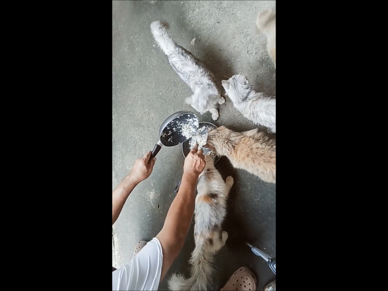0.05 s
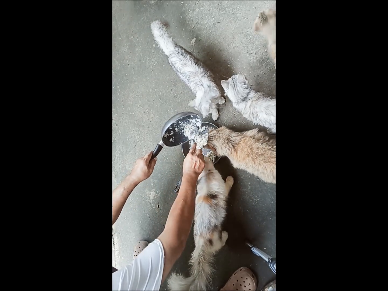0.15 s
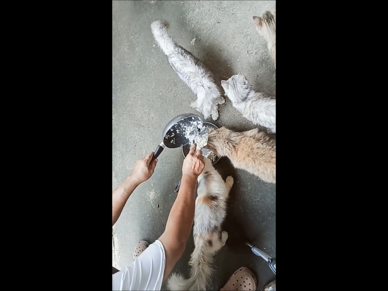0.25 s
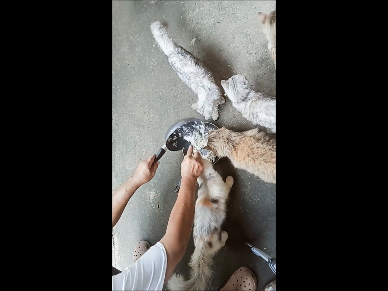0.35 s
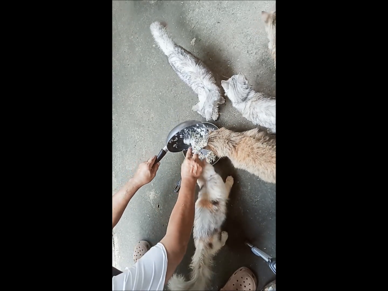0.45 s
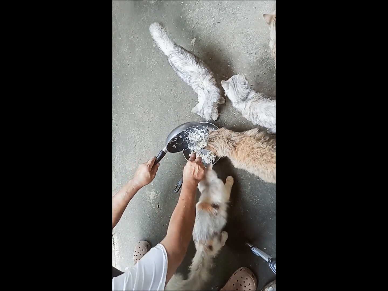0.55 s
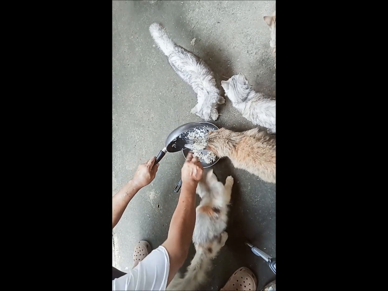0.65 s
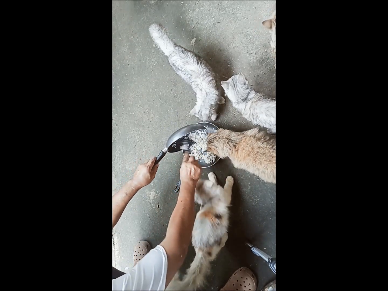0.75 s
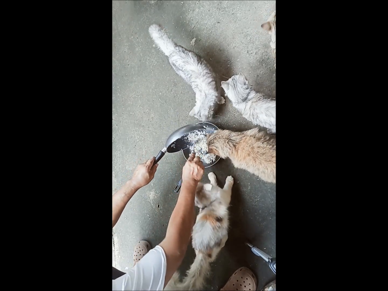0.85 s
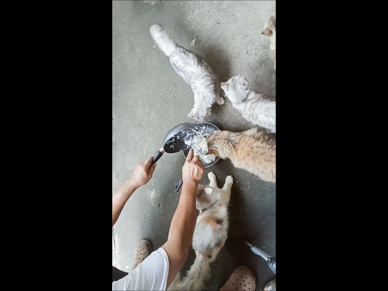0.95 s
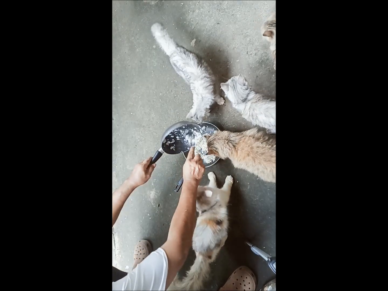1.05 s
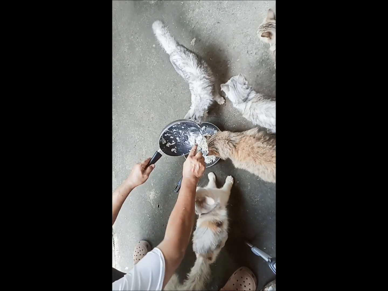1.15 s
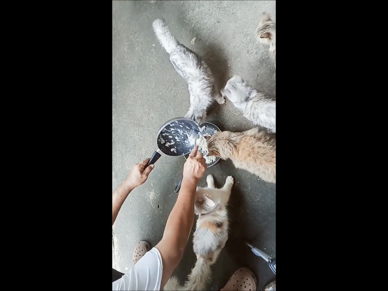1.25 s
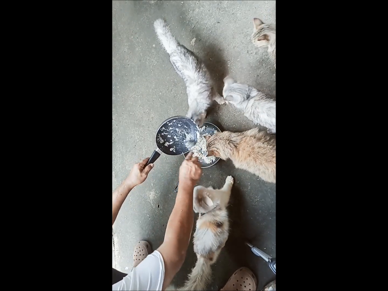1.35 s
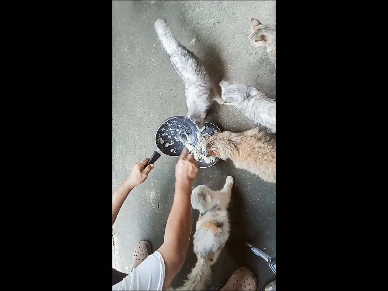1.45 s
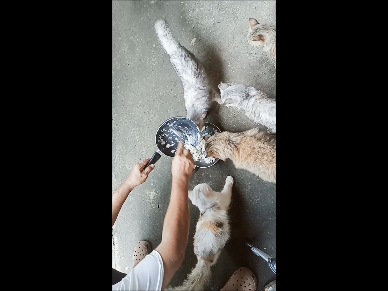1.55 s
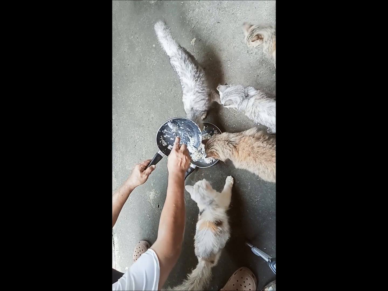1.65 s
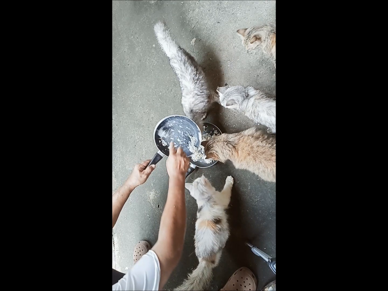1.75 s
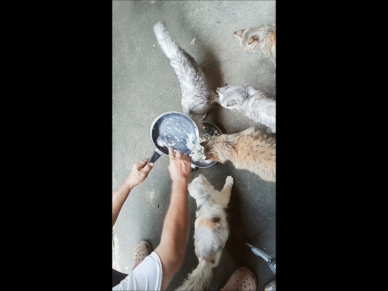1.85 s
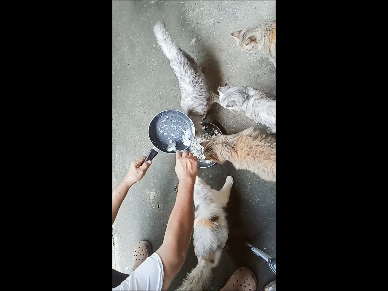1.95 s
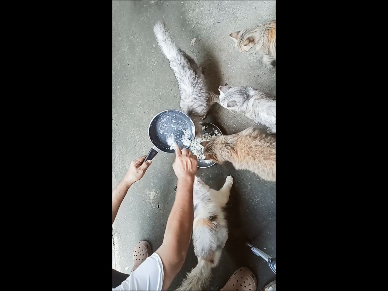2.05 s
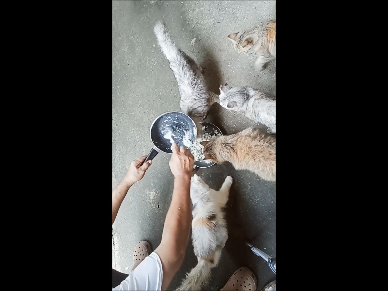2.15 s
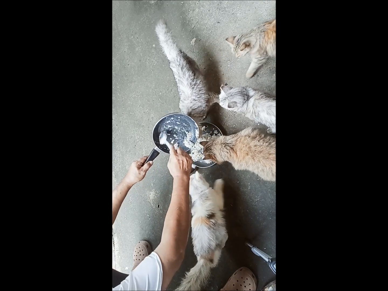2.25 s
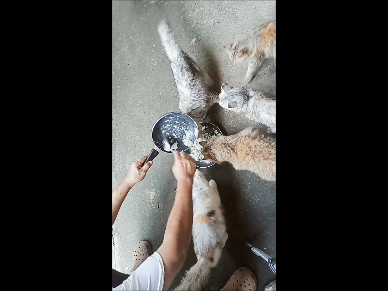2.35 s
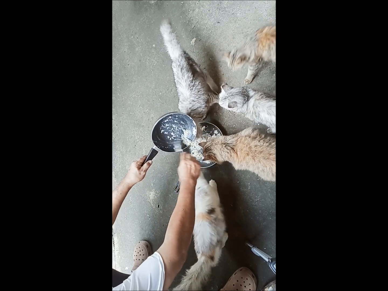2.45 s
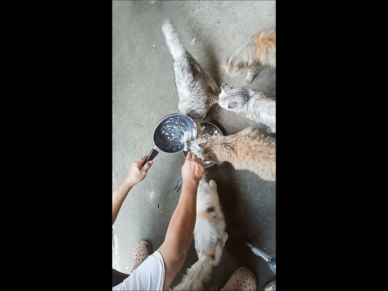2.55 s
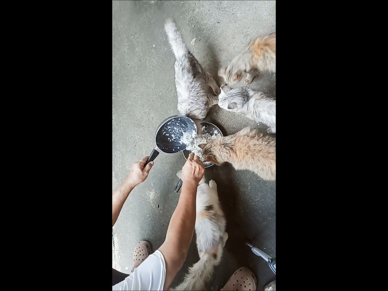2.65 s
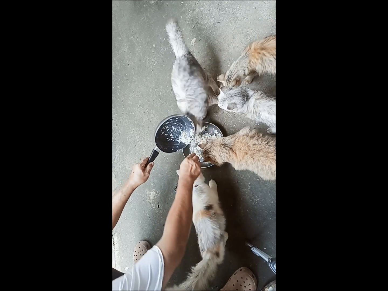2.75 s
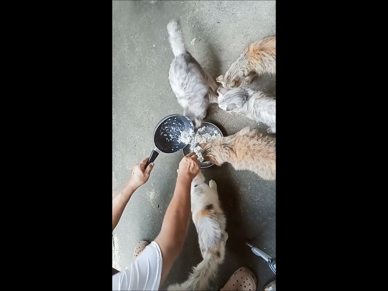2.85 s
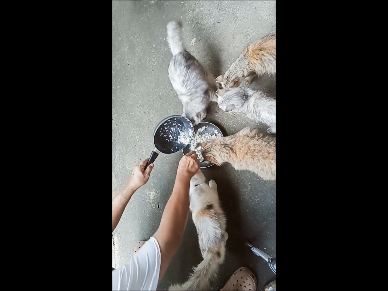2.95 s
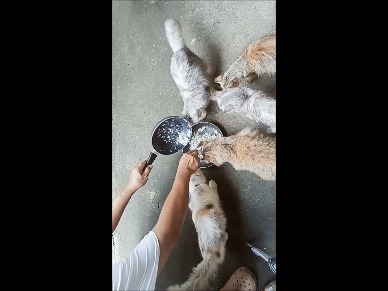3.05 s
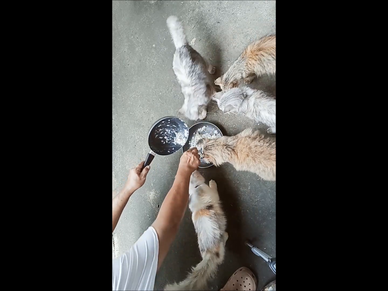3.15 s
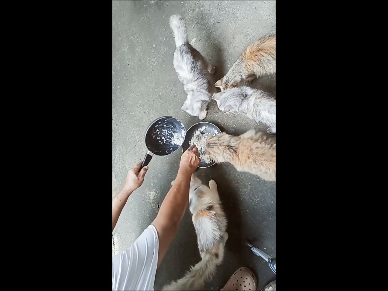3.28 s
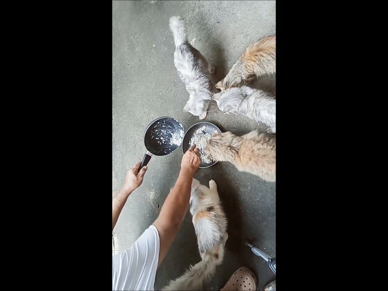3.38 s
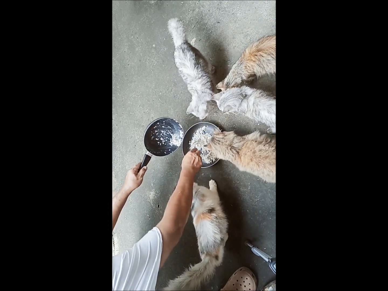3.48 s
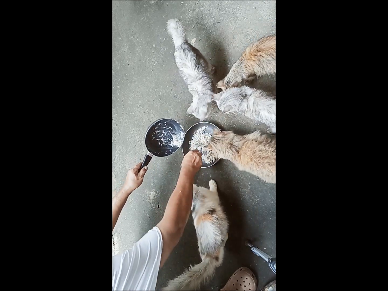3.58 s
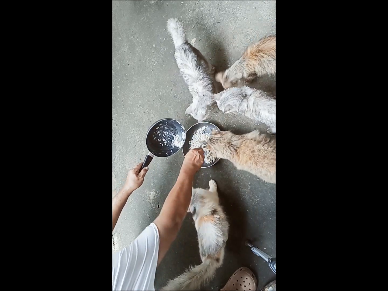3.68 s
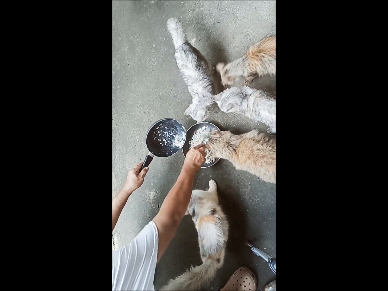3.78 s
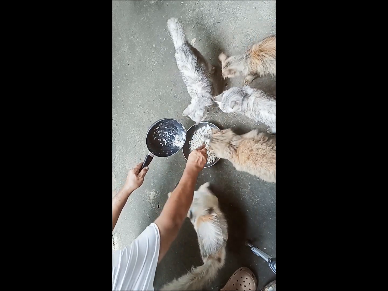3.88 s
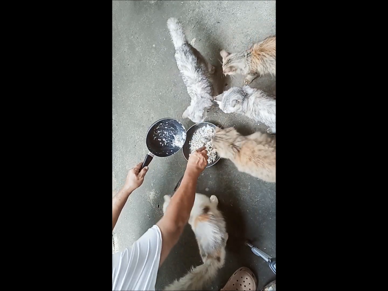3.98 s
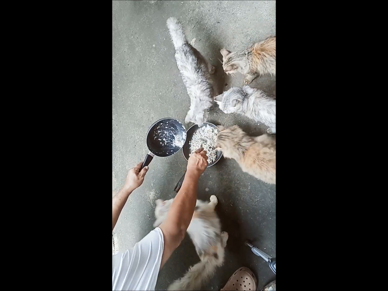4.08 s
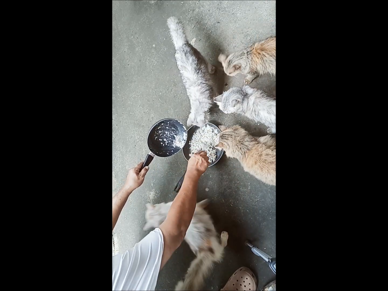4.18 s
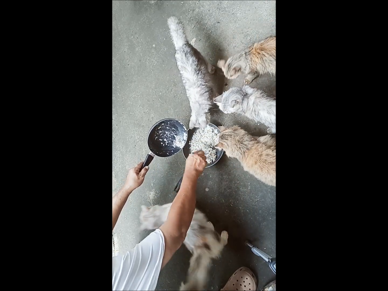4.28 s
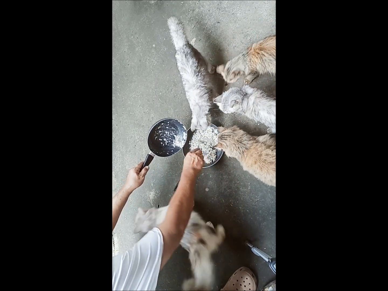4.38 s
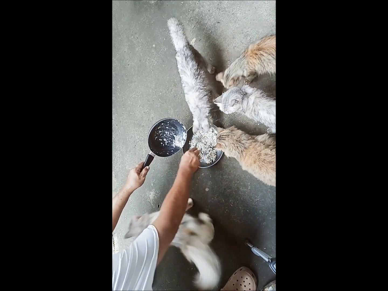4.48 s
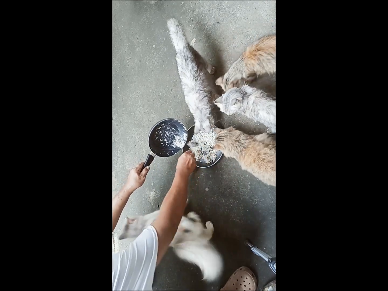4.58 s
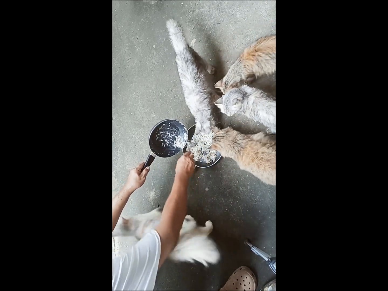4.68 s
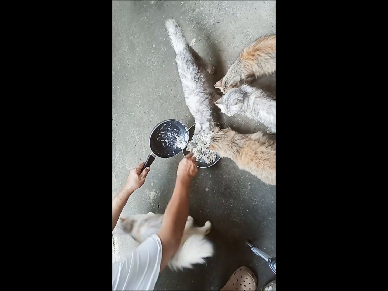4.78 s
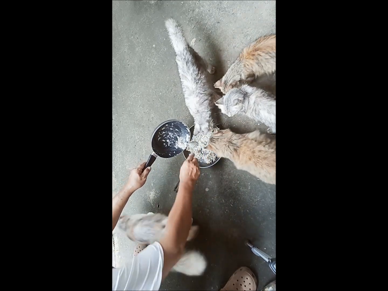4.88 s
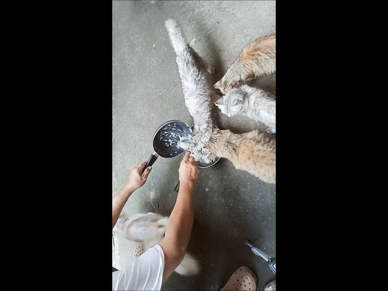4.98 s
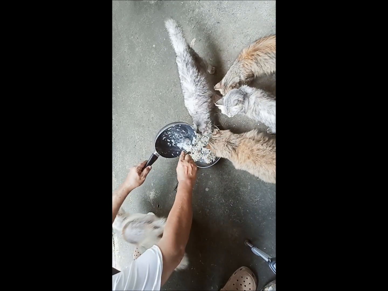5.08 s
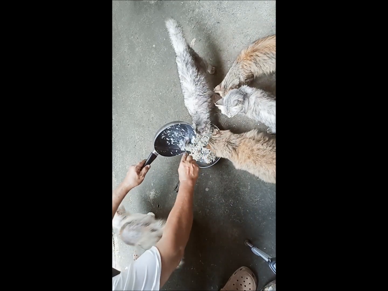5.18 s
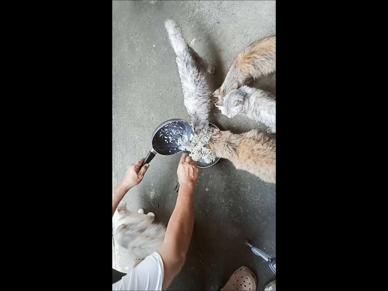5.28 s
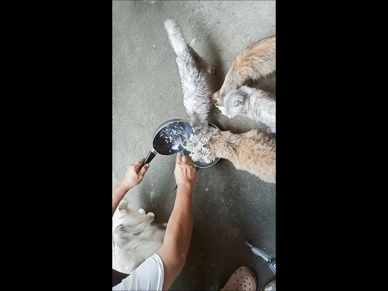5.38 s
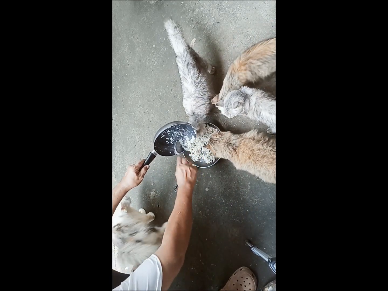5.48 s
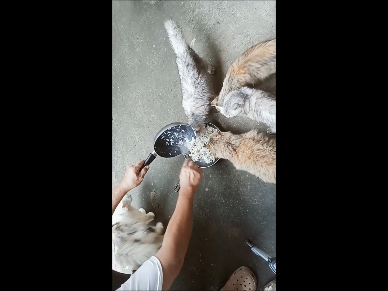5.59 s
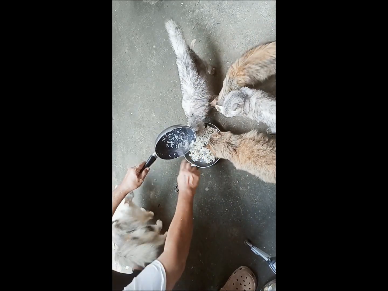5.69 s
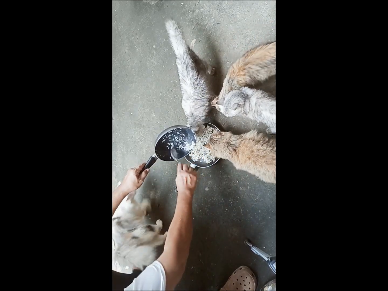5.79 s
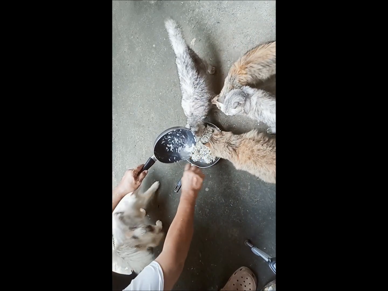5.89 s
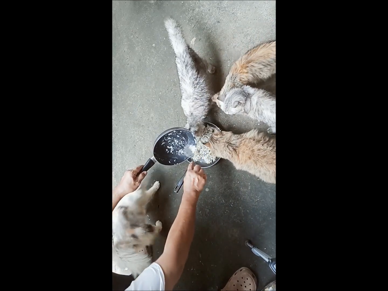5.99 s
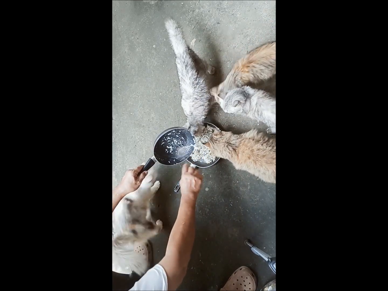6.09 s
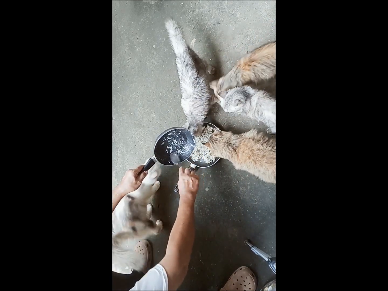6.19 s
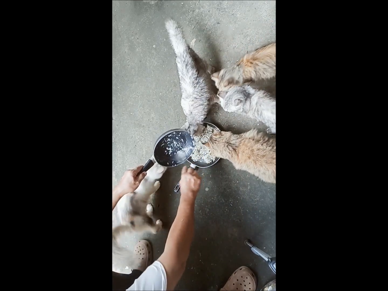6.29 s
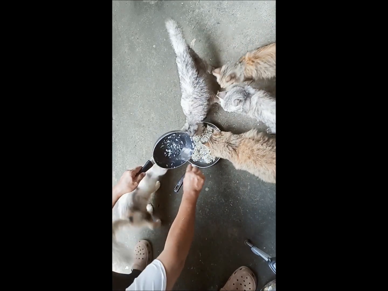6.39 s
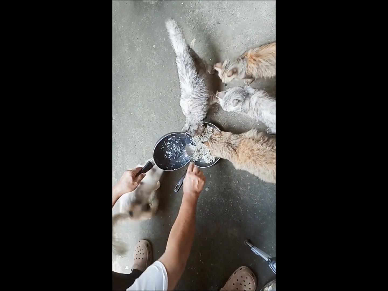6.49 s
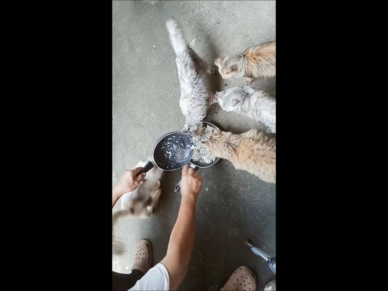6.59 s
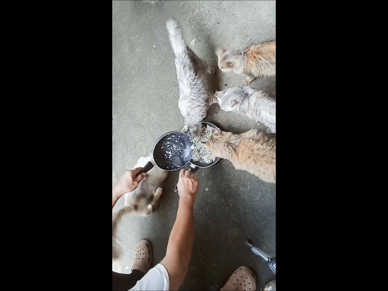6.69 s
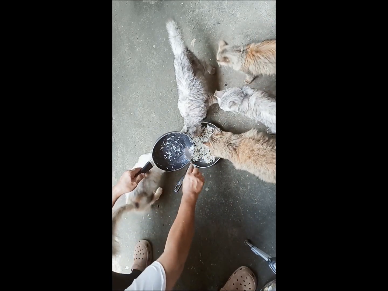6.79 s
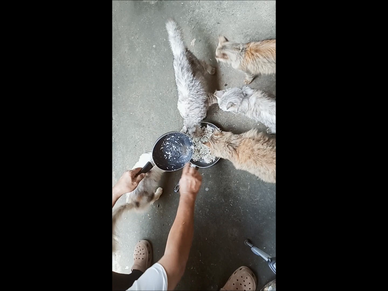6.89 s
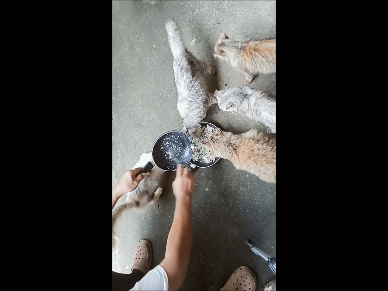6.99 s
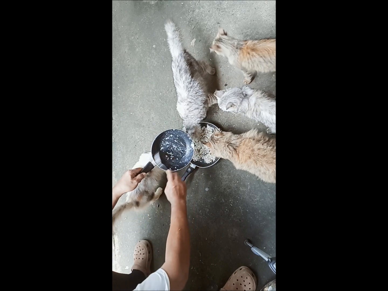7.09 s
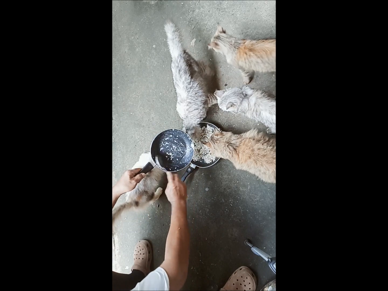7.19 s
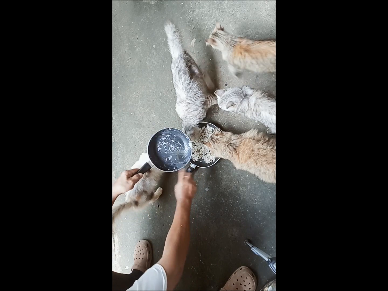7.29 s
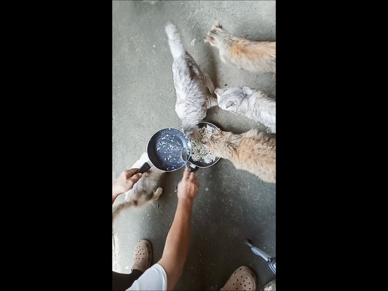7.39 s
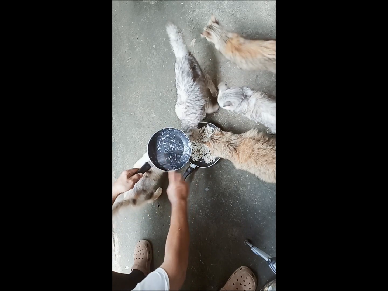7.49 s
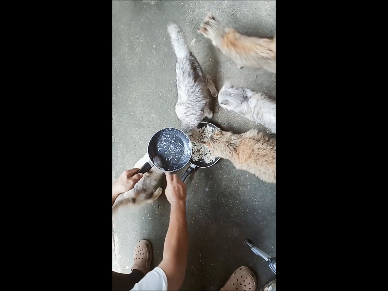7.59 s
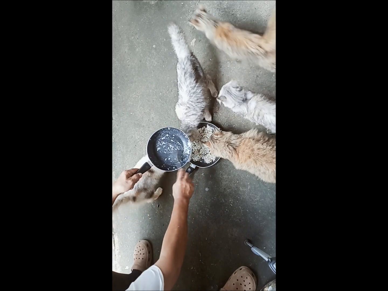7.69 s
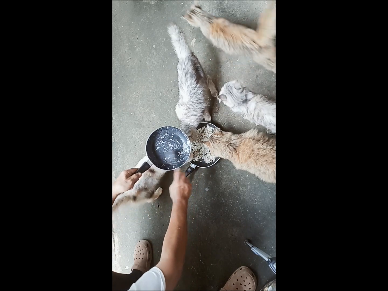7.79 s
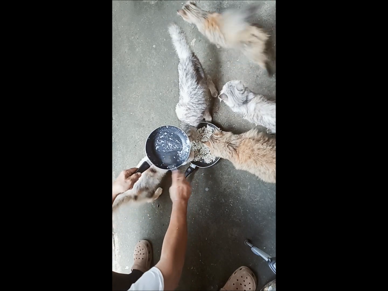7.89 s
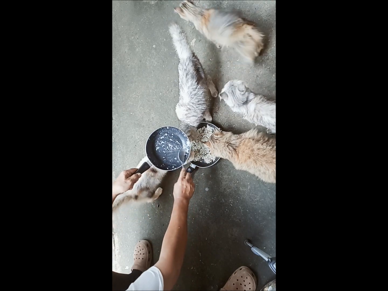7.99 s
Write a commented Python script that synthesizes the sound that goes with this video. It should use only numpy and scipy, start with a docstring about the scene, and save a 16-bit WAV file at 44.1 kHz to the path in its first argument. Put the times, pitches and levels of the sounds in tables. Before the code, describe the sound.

Close, uneven clanks and short squeaky scrapes of a spoon clearing rice from a metal pan, over faint outdoor air.

```python
"""Close clanks, scrapes and squeaks: a metal spoon knocks rice out of a frying pan into a dish on a
concrete floor. Pressed on the pan, the spoon clacks; bouncing off, it lets the pan ring. It then drags
over the metal in tiny slips, at times squeaking, and the rice rustles. Behind it are outdoor air,
a low throb and soft ticks of rice. A faint far motor hums in the pause."""
import sys
import numpy as np
from scipy import signal
from scipy.fft import rfft, irfft
from scipy.io import wavfile
from scipy.ndimage import uniform_filter1d

SR = 44100
rng = np.random.default_rng(int(sys.argv[2]) if len(sys.argv) > 2 else 0)


def generate_wav(sig):
    """Save sig (samples, or channels by samples) to the path in sys.argv[1] as 16-bit PCM at SR."""
    pcm = np.round(np.clip(np.atleast_2d(sig).T, -1, 1) * 32767).astype(np.int16)
    wavfile.write(sys.argv[1], SR, pcm)


N = 354563

# The pan's modes, the tones it rings with when free.
# Each row: pitch in Hz, level in dB, t60 (the seconds it takes to fade by 60 dB).
PAN_MODES = [(385, -10, 0.14), (557.8, -7.5, 0.33), (597, -1.5, 0.28), (633, -22, 0.098), (658, -5.5, 0.03),
             (1138, -2.5, 0.32), (1100, 1.5, 0.17), (1480, -12, 0.26), (1560, -40.5, 0.2), (1808, 4, 0.19),
             (2103, -9, 0.49), (2140, 3, 0.12), (2649, 1, 0.18), (3096, -1, 0.2), (3106, -9.5, 0.25),
             (3260, -24, 0.13), (3620, -13, 0.17), (3600, 2.5, 0.16), (4104, -0.5, 0.064), (4490, -8, 0.17),
             (4710, -14, 0.24), (4550, -40, 0.12), (5500, -19.5, 0.26), (5700, -34, 0.12),
             (6030, -15.5, 0.13), (6560, -18, 0.1), (7220, -20.0, 0.2), (8445, -13, 0.05)]
# The tone colour of the many weak modes of pan, spoon and dish. Each row: frequency in Hz, level in dB.
CLATTER_SPECTRUM = [(60, -22), (280, -1), (430, -23), (740, 3), (950, -1), (1350, 4), (1620, -4.5),
                    (2050, 2), (3100, 6), (4500, -16.5), (5100, -16.5), (8400, -10.5), (9800, -45),
                    (15500, -48)]
# The edges in Hz of seven bands: the thud, the body, then five more up to the top treble.
BAND_EDGES = [40, 300, 950, 1600, 2400, 4800, 9000, 16000]


def knock(start, pressed, t60, low_hz, clack_hz, level_db, body_db, bright_db, thud_db):
    """The spoon hits the pan: a sharp crack, the spoon's clack, the pan's longer ring and a low thud."""
    # The pressed spoon's upper modes. Each row: multiple of the clack pitch, level in dB.
    clack_modes = [(.655, -1.5), (0.999, 4), (1.36, -3), (1.689, -13.5), (1.852, -19), (2.08, -20),
                   (2.39, -16.5)]
    # The five bands above the body. Each row: level in dB, dB added per dB of brightness.
    upper_bands = [(-1, -0.29), (-0.5, 0.23), (-1, 0.62), (-16, 1.21), (-27, 1.56)]
    t = np.arange(SR // 4) / SR
    pressed = np.clip(pressed, .02, .96)
    spoon_modes = [(low_hz, 2, 0.076)]
    spoon_modes += [(clack_hz * ratio, db + 4.5 * rng.standard_normal(), 0.076)
                    for ratio, db in clack_modes]
    hard_start = 1 + 2 * amp(-3 - 60 * t / 0.047)
    spoon = unit_attack(ring(spoon_modes, t) * hard_start)
    # Contact and the load of rice shift the pan's modes a little from blow to blow.
    detune, usual_t60 = 0.006, 0.27
    shifted_modes = [(hz * (1 + detune * rng.standard_normal()), db + 2 * rng.standard_normal(),
                      life * t60 / usual_t60) for hz, db, life in PAN_MODES]
    pan = amp(-1) * unit_attack(ring(shifted_modes, t))
    crash = amp(-5) * unit_attack(clatter(t, t60)) + amp(-3.5) * unit_attack(crack(t, t60=0.044))
    crash *= 1 - .7 * pressed  # pressing muffles it
    thud_hz, thud_t60, thud_rise_s, rise_s = 92, 0.031, 0.0031, 0.00089
    thud = amp(thud_db - 1 - 60 * t / thud_t60) * np.sin(2 * np.pi * thud_hz * t)
    thud *= 1 - np.exp(-t / thud_rise_s)
    blow = np.sqrt(pressed) * spoon + np.sqrt(1 - pressed) * pan + crash + thud
    blow *= 1 - np.exp(-t / rise_s)
    shape_db = np.array([thud_db, body_db] + [db + lift * bright_db for db, lift in upper_bands])
    return start, struck_spot(blow, level_db + shape_db)


def clatter(t, t60, count=260, treble_db=-18):
    """A crowd of weak modes; every contact wakes a different set, and the high ones die first."""
    place, phase, chance = rng.random((3, count))
    hz = ((np.arange(count) + place) * BAND_EDGES[-1] / count).astype(int)
    strength = -np.log(1 - chance * .97) * amp(level_at(CLATTER_SPECTRUM, hz))
    spectrum = np.zeros(SR // 2 + 1, complex)  # one slot for each Hz
    spectrum[hz] = strength * np.exp(2j * np.pi * phase)
    is_high = np.arange(len(spectrum)) > BAND_EDGES[5]
    lows = irfft(spectrum * ~is_high)[:len(t)]
    highs = irfft(spectrum * is_high)[:len(t)] * amp(treble_db * t / t60)
    return amp(-60 * t / t60) * (lows + highs)


def crack(t, t60):
    """The brief burst of noise when metal meets metal."""
    return colour(rng.standard_normal(len(t)) * amp(-60 * t / t60), CLATTER_SPECTRUM)


def struck_spot(blow, levels_db, size=8192):
    """The spot that is struck decides how loud each band is in the first 25 ms of a blow."""
    head = blow[:SR // 40] * signal.windows.tukey(SR // 40, .1)
    hz = np.fft.rfftfreq(size, 1 / SR)
    power = abs(rfft(head, size)) ** 2 * 2 / size / len(head)
    points = []
    for low, high, db in zip(BAND_EDGES, BAND_EDGES[1:], levels_db):
        lift_db = db - 10 * np.log10(power[(hz >= low) & (hz < high)].sum())
        points += [(low * 1.07, lift_db), (high / 1.07, lift_db)]
    return colour(blow, points)


def scrape(start, length, drag_db, swell_db, body_db, edge_db, pressed, slips_per_s=1600):
    """Tiny slips of the spoon's edge shake the pan and the spoon."""
    # The dragged spoon's resonances. Each row: pitch in Hz, width in Hz, level in dB.
    spoon_resonances = [(750, 113, 11.5), (1310, 44, -30), (2053, 67, 14.5), (2720, 150, 14),
                        (2720, 20, -10), (3330, 13, 9), (3770, 30, 13), (4590, 26, 4), (7200, 55, -2),
                        (8550, 140, -28)]
    # The scrape's tone colour: fuller lows and mids, a softer top treble.
    # Each row: frequency in Hz, gain in dB.
    scrape_tone = [(3000, 5), (4100, -2), (8700, -3), (9800, -1), (15000, -6)]
    t, ring_t = np.arange(-.1, length + .2, 1 / SR), np.arange(SR // 4) / SR
    slipping = rng.random(SR)[:len(t)] < slips_per_s / SR
    slip_size = amp(4 * np.clip(rng.standard_normal(SR)[:len(t)], -2, 2))
    hiss = 0.18 * rng.standard_normal(SR)[:len(t)]
    slips = (unit(slipping * slip_size) + hiss) * amp(-0.5 * wander(len(t), 90))
    damped_pan = ring([(hz, db, 0.55 * t60) for hz, db, t60 in PAN_MODES], ring_t)
    weak_modes = clatter(ring_t, t60=0.093, count=160, treble_db=-8)
    pan = unit(signal.fftconvolve(slips, damped_pan)[:len(t)])
    rattle = unit(signal.fftconvolve(slips, weak_modes)[:len(t)])
    shift = 1 + 0.0422 * wander(len(t), 28)  # the moving contact point bends the spoon's pitches
    spoon = unit(sum(amp(db) * unit(resonate_twice(slips, hz * shift, 2 * width))
                     for hz, width, db in spoon_resonances))
    pressed = np.clip(pressed, 0, .9)
    sound = colour(np.sqrt(1 - pressed) * pan + np.sqrt(pressed) * spoon + amp(-6) * rattle, scrape_tone)
    # The body stays level, the drag follows the push, and a growing push adds extra sizzle.
    progress = np.clip(t / length, 0, 1) - .5
    push_db = swell_db * progress
    sizzle_db = 0.99 * max(swell_db, 0) * progress
    body = unit(band(sound, "low", 950)) * amp(body_db)
    drag = unit(band(sound, "band", (950, 4800))) * amp(push_db)
    edge = unit(band(sound, "high", 4800)) * amp(push_db + sizzle_db + edge_db)
    bite_s, release_s = 0.0017, 0.024  # a stroke bites quickly, holds, and dies away with the pan
    contact = np.exp(np.minimum(t, 0) / bite_s - np.maximum(t - length, 0) / release_s)
    return start + t[0], amp(drag_db - 1) * (body + drag + edge) * contact


def squeak(start, length, first_hz, last_hz, db, flutter_db=3):
    """The spoon sticks and slips: a rough tone that glides as the contact travels along its edge."""
    count = int(length * SR)
    jitter = 0.022 * wander(count, 700)
    tone = sine(np.linspace(first_hz, last_hz, count) * (1 + jitter))
    flutter = amp(flutter_db * wander(count, 302))
    return start, amp(db) * unit(tone * flutter * signal.windows.tukey(count, .7))


def skid(start, pressed, t60, low_hz, clack_hz, level_db, body_db, bright_db, thud_db):
    """After a knock the spoon slides on with a falling groan, louder with more pressure and body."""
    delay_s, length_s, sag = 0.00805, 0.054, 0.021
    db = level_db - 12 + 2.16 * min(body_db, 6) - 25 * (1 - pressed)
    return squeak(start + delay_s, length_s, low_hz * (1 + sag), low_hz * (1 - sag), db, flutter_db=3.5)


def rustle(middle, length, hz, db):
    """Rice slides over metal with a soft, grainy swish."""
    count = int(length * SR)
    grains = rng.standard_normal(SR)[:count] * amp(2 * wander(count, 250))
    swish = resonate_twice(grains, hz, width=800) * signal.windows.tukey(count, .8)
    return middle - length / 2, amp(db) * unit(swish)


def echoes(sound, t60=0.33, echo_db=-15, echoes_per_s=2000):
    """The floor and nearby walls send back a short, thin tail."""
    t = np.arange(SR // 2) / SR
    taps = rng.choice([-1, 1], len(t)) * (rng.random(len(t)) < echoes_per_s / SR)
    tail = taps * (t > .006) * amp(-60 * t / t60)
    return amp(echo_db) * signal.fftconvolve(sound, tail / np.linalg.norm(tail))[:N]


def motor(start=2.79, length=1.0, rise_s=0.041, fall_s=0.18, hz=119, sag_hz_per_s=10.5):
    """A far motor sets in, hums lower as it loses speed, beats gently and fades out."""
    t = np.arange(N) / SR
    age = t - start
    fade = np.clip(np.minimum(age / rise_s, (length - age) / fall_s), 0, 1)
    beat_hz, crest_s = 1.54, 2.84
    beat_db = 2.5 * np.cos(2 * np.pi * beat_hz * (t - crest_s))
    return unit(sine(hz - sag_hz_per_s * age)) * fade * amp(-50 + beat_db)


def outdoor_air():
    """A soft rush of air that swells and sinks in small patches of time and pitch."""
    # The air's tone colour. Each row: frequency in Hz, level in dB.
    air_spectrum = [(25, -19), (45, -22), (65, -7), (120, 0), (200, -3.5), (400, -7), (700, -8.5),
                    (1200, -12.5), (2100, -16), (3900, -18), (5300, -40.5), (8200, -42.5), (10000, -51.5),
                    (16000, -50)]
    # Its slow rise and fall. Each row: time in seconds, relative level in dB.
    air_levels = [(0, -45), (2.7, -46), (4.9, -48.5), (5.8, -44), (8, -48.5)]
    cells = signal.stft(colour(rng.standard_normal(N), air_spectrum), nperseg=1024)[2]
    patches = uniform_filter1d(rng.standard_normal(cells.shape), size=11, axis=0)  # smooth over pitch
    patches = unit(uniform_filter1d(patches, size=8, axis=1))  # and over time
    rush = signal.istft(cells * amp(2 * patches), nperseg=1024)[1][:N]
    return unit(rush) * amp(over_time(air_levels) - 6 + 1.15 * wander(N, 18))


def throb(hz=66):
    """A faint, low tone that wavers in pitch and level."""
    # Each row: time in seconds, level in dB.
    throb_levels = [(0, -63), (3.5, -65), (3.7, -50.5), (4.0, -74.5), (8, -68)]
    tone = unit(sine(hz + 7 * wander(N, 40)))
    return tone * amp(over_time(throb_levels) + 0.74 * wander(N, 12))


def rice_ticks(ticks_per_s=30):
    """Soft ticks of rice being pushed about and eaten."""
    clicks = (rng.random(N) < ticks_per_s / SR) * rng.random(N)
    ticks = signal.fftconvolve(clicks, crack(np.arange(SR // 8) / SR, t60=0.046))[:N]
    return amp(-67) * unit(resonate(ticks, hz=3200, width=3000))


def amp(db):
    """Turns decibels into a gain."""
    return 10 ** (np.asarray(db) / 20)


def unit(x):
    """Scales a sound to an average level (rms) of 1."""
    return x / np.sqrt(np.mean(x ** 2) + 1e-20)


def unit_attack(x):
    """Scales a blow to rms 1 over its first 25 ms."""
    return x / np.sqrt(np.mean(x[:SR // 40] ** 2) + 1e-20)


def level_at(points, hz):
    """Reads the level at hz from (Hz, dB) points, on a log-frequency axis."""
    point_hz, db = np.transpose(points)
    return np.interp(np.log(hz + 1), np.log(point_hz), db)


def over_time(points):
    """Joins (seconds, value) points into a curve as long as the scene."""
    return np.interp(np.arange(N) / SR, *np.transpose(points))


def wander(count, turns_per_s):
    """A smooth random drift, about 1 in size."""
    knots = rng.standard_normal(4096)
    return np.interp(np.arange(count) * turns_per_s / SR, np.arange(len(knots)), knots)


def sine(hz):
    """A pure tone that follows a pitch curve."""
    return np.sin(2 * np.pi * np.cumsum(hz) / SR)


def ring(modes, t):
    """Adds up fading tones from rows of (Hz, dB, t60)."""
    return sum(amp(db - 60 * t / t60) * np.sin(2 * np.pi * (hz * t + rng.random()))
               for hz, db, t60 in modes)


def resonate(x, hz, width):
    """Keeps the sound near hz, which may move; the width is in Hz."""
    turn = np.exp(2j * np.pi * np.cumsum(hz * np.ones(len(x))) / SR)
    decay = np.exp(-np.pi * width / SR)
    return 2 * (turn * signal.lfilter([1 - decay], [1, -decay], x / turn)).real


def resonate_twice(x, hz, width):
    """Two passes make a resonance with steeper sides."""
    return resonate(resonate(x, hz, width), hz, width)


def band(x, kind, hz, order=8):
    """Keeps the lows, the highs or a band between."""
    return signal.sosfilt(signal.butter(order, hz, kind, fs=SR, output="sos"), x)


def colour(x, points, size=4096):
    """Filters a sound by a curve of (Hz, dB) points."""
    cepstrum = irfft(np.log(amp(level_at(points, np.fft.rfftfreq(size, 1 / SR)))))
    cepstrum[1:size // 2] *= 2  # folded so that nothing rings ahead of a hit
    cepstrum[size // 2 + 1:] = 0
    return signal.fftconvolve(x, irfft(np.exp(rfft(cepstrum))))[:len(x)]


def add(mix, start, sound):
    """Mixes a sound in at a start time in seconds."""
    part = mix[max(round(start * SR), 0):][:len(sound)]
    part += sound[:len(part)]


def scene():
    """Spoon, pan and rice with their echoes, over the quiet yard."""
    # Each row: start in seconds, pressed share from 0 to 1, the pan's t60 in seconds, the spoon's low
    # pitch and clack pitch in Hz, level in dB, then body, brightness and thud in relative dB.
    knocks = [(0.036, 0.65, 0.19, 794, 2330, -43, -9.5, -6.5, -25.5),
              (0.097, 0.3, .15, 660, 1880, -47, -20, -1, -27),
              (0.199, 0.82, 0.14, 810, 2102, -30.5, 1, 1.5, -20.5),
              (0.509, 0.93, 0.3, 751, 2003, -29, 8, -2.5, -47),
              (0.624, 0.1, .18, 566, 2070, -25, -5.5, -4, -27),
              (0.854, 0.7, 0.23, 598, 2070, -27.5, 3, 3, -22),
              (1.3088, 0.38, 0.28, 579, 1934, -27.5, 2.5, 3, -16.5),
              (1.327, 0.3, 0.26, 558, 1780, -20.5, -1, -1.5, -18),
              (1.749, 0.43, 0.22, 640, 2120, -42, 2, 7, -12),
              (1.86, 0.24, 0.46, 510, 1740, -32.5, 1.5, -5, -18),
              (2.3777, 0.28, 0.2, 675, 1880, -23, -0.5, -2.5, -16),
              (4.7599, 0.43, .18, 598, 2270, -30.5, -3, 2, -22),
              (5.1819, .95, 0.22, 674, 1978, -21, 5, -1, -17),
              (5.259, 0.23, 0.28, 548, 1770, -31, 6.5, -5, -15),
              (5.549, 1, 0.27, 641, 1960, -20.5, 0.5, -4, -27),
              (5.598, 0.37, 0.18, 589, 2020, -31, 3.5, 2, -15.5),
              (5.925, 0.42, 0.24, 563, 2360, -27, -.5, 4, -17.5),
              (6.002, 0.15, 0.18, 675, 2180, -32, -3.5, 6, -18),
              (6.319, 0.72, .16, 750, 1915, -26.5, -1.5, -0.5, -28),
              (6.378, 0.97, .35, 594, 2350, -41.5, 4.5, 3, -21),
              (6.469, 0.25, 0.39, 572, 1900, -47, 8, 0, -21),
              (6.781, 0.81, 0.19, 696, 1937, -22, 1, -2, -27),
              (6.8361, 0.35, 0.24, 575, 2240, -33, 9.5, 4, -14),
              (7.2404, 0.43, 0.15, 499, 2225, -22.5, -4, 7, -6),
              (7.3047, 0.44, 0.4, 581, 1795, -28, 2.5, 2, -25),
              (7.4307, 0.26, 0.16, 546, 2146, -25, 9.5, 5, -10.5),
              (7.697, 0.36, .2, 547, 2220, -29, 2.5, 3.5, -17.5),
              (7.957, 0.52, 0.34, 631, 1826, -20, 1.5, -1.5, -28)]
    # Each row: start and length in seconds, drag level midway in dB, swell from start to end in dB,
    # body and edge sizzle in dB relative to the drag, pressed share from 0 to 1.
    strokes = [(0.878, 0.042, -30, 8, -5, -16.5, 0.08), (1.395, 0.079, -38, -3, -5, -18.5, 0.07),
               (1.831, 0.028, -38.5, 0, -4, -11, 0), (1.861, 0.15, -27.5, 2, -6, -15.5, 0.04),
               (2.439, 0.11, -31.5, 5.5, -6.5, -14, 0.37), (2.57, 0.029, -29.5, -6, -11.5, -11, 0),
               (5.619, 0.055, -32, -1, -4, -14.5, 0.2), (5.975, 0.099, -36, -4, -3.5, -18, 0),
               (6.39, 0.05, -38.5, 0, -7, -15, 0.7), (6.866, .066, -35, -4, -14, -13.5, .16),
               (7.32, 0.079, -25, 10.5, -17, -13.5, 0.92), (7.728, 0.073, -24, 4, -14, -13.5, 0.92),
               (7.973, 0.06, -22, -18.5, -10.5, -20.5, 0.06)]
    # Each row: middle time and length in seconds, centre pitch in Hz, level in dB.
    rustles = [(.012, 0.042, 1890, -45.5), (0.798, 0.029, 2030, -49.5), (1.66, 0.073, 3000, -63),
               (3.806, 0.18, 3600, -63), (4.516, 0.17, 2860, -65), (5.115, 0.18, 4070, -66.5),
               (7.105, 0.2, 3580, -61.5), (7.689, 0.013, 600, -52)]
    # Each row: start and length in seconds, first and last pitch in Hz, level in dB.
    squeaks = [(1.389, 0.13, 1822, 1798, -40.5), (1.86, 0.16, 1837, 1790, -36.5),
               (1.869, 0.22, 4050, 4085, -44.5), (2.41, 0.232, 1830, 1820, -33.5),
               (2.461, 0.11, 4220, 4085, -44), (2.467, .075, 3700, 3620, -42),
               (2.582, 0.027, 1506, 1570, -31.5), (6.341, 0.032, 2556, 2800, -38.5),
               (6.394, 0.078, 2575, 2310, -36), (7.245, 0.053, 3095, 3170, -27),
               (7.32, 0.0235, 683, 625, -28), (7.357, 0.038, 672, 777, -23), (7.36, 0.024, 3830, 3680, -31),
               (7.739, 0.092, 738, 674, -32), (7.754, 0.15, 2720, 2634, -39.5),
               (7.97, 0.067, 647, 649, -24.5)]
    close = np.zeros(N)
    for source, rows in ((knock, knocks), (skid, knocks), (scrape, strokes),
                         (rustle, rustles), (squeak, squeaks)):
        for row in rows:
            add(close, *source(*row))
    return (close + echoes(close) + motor() + outdoor_air() + throb() + rice_ticks())[None]


def record(dry, bass_hz=45, top_hz=15750):
    """A small microphone drops the deep bass and rounds loud peaks; the highest treble is then cut."""
    thin = band(dry, "high", bass_hz, order=2)
    rounded = thin / (1 + (thin / .95) ** 6) ** (1 / 6)
    treble_cut = signal.firwin(401, top_hz, window=("kaiser", 8), fs=SR)
    return signal.oaconvolve(rounded, treble_cut[None], "same")


dry = scene()
out = record(dry)
generate_wav(out)
```